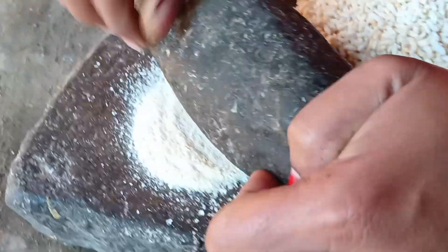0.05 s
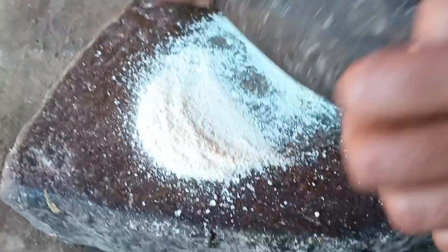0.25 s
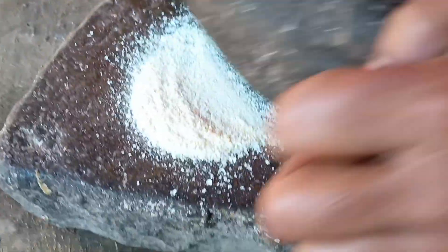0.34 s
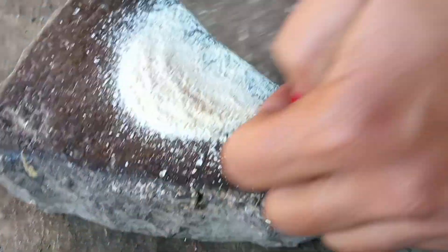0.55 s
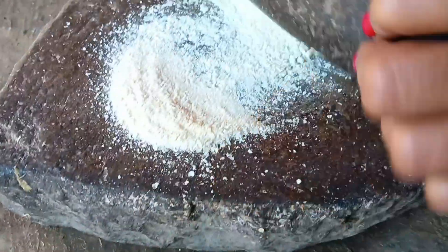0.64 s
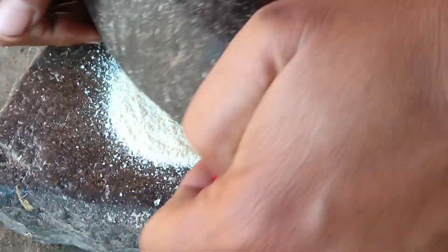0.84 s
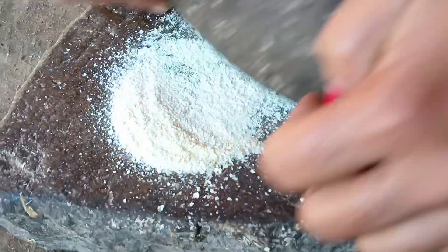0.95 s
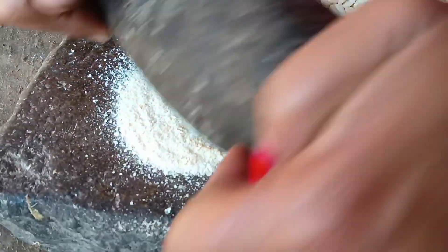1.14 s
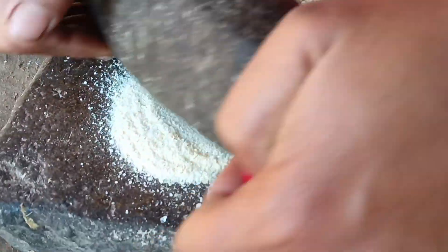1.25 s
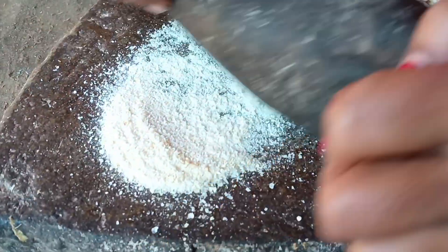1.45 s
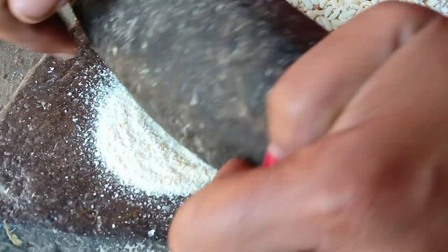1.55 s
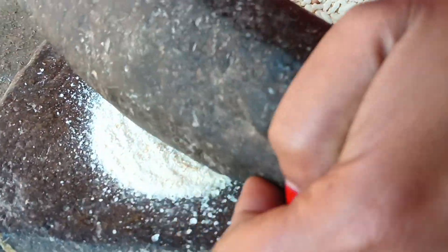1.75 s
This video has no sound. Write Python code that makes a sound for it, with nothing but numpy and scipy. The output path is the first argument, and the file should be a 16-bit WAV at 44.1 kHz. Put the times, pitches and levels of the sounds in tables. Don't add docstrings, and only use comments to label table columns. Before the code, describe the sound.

A stone muller grinds crushed rice on a stone slab, harder pushes alternating with lighter pulls, gritty and hissing; glass bangles clink loudly at the turns, chicks peep faintly in a quiet yard, heard close by.

```python
import sys
import numpy as np
from scipy import signal
from scipy.fft import rfft, irfft, next_fast_len
from scipy.io import wavfile
from scipy.ndimage import uniform_filter1d, map_coordinates

SR = 44100
rng = np.random.default_rng(int(sys.argv[2]) if len(sys.argv) > 2 else 0)


def master_out(mix):
    frames = np.transpose(np.atleast_2d(mix))
    ceiling = np.clip(frames, -1, 1)
    pcm = np.round(ceiling * 32767).astype(np.int16)
    wavfile.write(sys.argv[1], SR, pcm)


def undo_db(level):
    steps = np.asarray(level, float) / 20
    return 10 ** steps


N = 79380
T = np.arange(N) / SR


def unit(x):
    return x / np.sqrt(np.mean(x ** 2) + 1e-20)


def filtered(x, response):
    m = next_fast_len(len(x) + 8192)
    spectrum = rfft(x, m) * response(np.fft.rfftfreq(m, 1 / SR))
    return irfft(spectrum, m)[:len(x)]


def colour(points):
    f, db = np.transpose(points)
    return lambda hz: undo_db(np.interp(np.log(hz + 1), np.log(f), db))


def resonant(peaks):
    def response(f):
        total = 0
        for k, (centre, width, db) in enumerate(peaks):
            band = 1j * f * width
            total = total + (-1) ** k * undo_db(db) * band / (centre * centre - f * f + band)
        return total
    return response


def wobble(rate_hz):
    return map_coordinates(rng.standard_normal(int(N * rate_hz / SR) + 4), [T * rate_hz])


def grit(per_s, spread_db):
    hits = (rng.random(N) < per_s / SR) * rng.uniform(-0.68, 1, N)
    return hits * undo_db(spread_db * np.minimum(rng.exponential(size=N), 2))


def swell(rows, layer, top, pointed):
    power = 0
    warp = np.log(.5) / np.log(np.clip(top, .1, .9))
    for start, length, *db in rows:
        u = np.clip((T - start) / length, 0, 1) ** warp
        power = power + (undo_db(db[layer]) * np.abs(np.sin(np.pi * u)) ** pointed) ** 2
    return np.sqrt(power)


def yard():
    # f/Hz, level/dB per Hz
    air = [(24, -51), (55, 15.5), (237, 7), (1210, -2.5), (2770, 0.5), (3060, -1.5), (5440, -3),
           (6330, -14), (16000, -17.5)]
    noise = unit(filtered(rng.standard_normal(N), colour(air)))
    return undo_db(-50 + 0.86 * wobble(8.8)) * noise


def walls(x):
    t60_s = 0.16
    tail = filtered(rng.standard_normal(SR // 3), lambda f: 1 / (1 + f / 6000))
    tail = tail * undo_db(-60 * T[:SR // 3] / t60_s)
    return signal.fftconvolve(np.pad(x, (200, 0)), tail / np.linalg.norm(tail))[:N]


def chicks():
    # start/s, fall begins/s, end/s, top f/Hz, end f/Hz
    peeps = [
        (-.002, .04, .106, 5200, 3050),
        (.862, .92, 1.0, 3550, 2280),
        (1.128, 1.168, 1.218, 3390, 2380),
        (1.68, 1.715, 1.83, 5650, 4700),
        (1.712, 1.755, 1.765, 4620, 4550),
        (1.222, 1.245, 1.255, 5200, 5150),
    ]
    peep_db = [-52, -50, -45, -56.5, -58, -54.5]
    rise_s, rise_share = .006, .12
    fade_db, flutter_db, waver_hz = 4, 3.5, 20
    out = 0
    for (start, knee, end, top_hz, end_hz), db in zip(peeps, peep_db):
        down = np.sin(np.pi / 2 * np.clip((T - knee) / (end - knee), 0, 1)) ** 2
        rise = 1 - rise_share * np.exp(-np.abs(T - start) / rise_s)
        pitch_hz = top_hz * rise - (top_hz - end_hz) * down
        edge = np.clip(np.minimum(3 * (T - start), end - T) / 0.017, 0, 1)
        phase = 2 * np.pi * np.cumsum(pitch_hz + waver_hz * wobble(150)) / SR
        gain = undo_db(db - fade_db * down + flutter_db * wobble(69.53))
        out = out + np.sqrt(2) * edge * gain * np.sin(phase)
    return out


def thuds():
    # t/s, level/dB
    nudges = [
        (0.03, -32),
        (0.267, -29),
        (1.678, -35),
    ]
    out = 0
    for s, db in nudges:
        v = np.clip(T - s, 0, 1) / 0.0012
        out = out + undo_db(db) * 5.4 * v * (1 - v / 2) * np.exp(-v)
    return out


def loose_bangle():
    # t/s, f/Hz, level/dB, t60/s
    loose = [(.118, 10940, -40.5, 0.078), (0.458, 8580, -24.5, 0.043), (.803, 13690, -34, .1),
             (0.804, 8600, -32, 0.054), (1.0077, 11130, -26, 0.061), (1.206, 13100, -32, .08),
             (1.535, 13900, -19, 0.089), (1.646, 6850, -41.5, .08), (1.745, 13800, -35, 0.057),
             (.772, 2300, -49, .05), (.789, 2410, -41, .08), (.806, 2425, -33.5, 0.061),
             (0.791, 3430, -38, 0.028), (.808, 3300, -27, 0.022), (1.009, 3280, -28.5, 0.036),
             (1.012, 2390, -33, 0.075), (1.166, 2210, -40, .05), (1.177, 2485, -38.5, 0.086),
             (.417, 3180, -30.5, 0.025), (1.0095, 5300, -42, .02), (.145, 2226, -30, 0.065),
             (.518, 2090, -26, 0.046), (1.744, 8960, -33, 0.06)]
    out = 0
    for s, hz, db, t60_s in loose:
        decay = (T > s) * undo_db(db - 60 * np.abs(T - s) / t60_s)
        out = out + decay * np.sin(2 * np.pi * hz * (T - s))
    return out


def bangles():
    # t/s, peak/dB, brightness/dB per octave, decay factor,
    # free f/Hz
    clinks = [(0.0681, -16, 1.5, 0.94, 14000), (0.117, -18, 0.5, 0.9, 8600), (0.2358, -20, -23, 0.76, 8350),
              (0.2619, -13, -5, 2.4, 8600), (0.2817, -12.5, -8.5, 5.1, 8200),
              (0.4003, -28, -10, 0.74, 9530), (0.4162, -8.5, -3, 0.79, 12500),
              (0.4192, -14.5, -0.5, 1, 9600), (0.426, -24, 2, 0.8, 9900), (0.4411, -12.5, 5, 1.5, 9700),
              (0.4512, -24, 9, 0.6, 14000), (0.458, -6.5, -2, 0.65, 9700), (0.463, -8.5, 4, 1.2, 8750),
              (0.4671, -16.5, 0, 0.8, 8750), (0.635, 2.5, -3, 0.7, 9000), (0.7714, -15, -1, 0.89, 14700),
              (0.7881, -8, 5.5, 0.96, 9700), (0.7949, -4, 10, 0.79, 14500), (0.7993, -7.5, -4, 0.62, 8750),
              (0.8022, -3, 1.5, 1.4, 9400), (0.8049, -2.5, 10, 1.3, 9600), (0.811, -15.5, 5, 1.2, 13600),
              (0.8146, -17, 4, 1.6, 13700), (0.842, -35, -5, 0.7, 7500), (0.8475, -42, -6, 0.6, 7000)]
    later_clinks = [(0.9908, -22.5, 1, 1.9, 9800), (1.009, 1, -11.5, 0.46, 6830), (1.0135, -7, 6, 1.3, 9100),
                    (1.042, -11, 19, 0.7, 15000), (1.0446, -12, 12, 0.5, 15400), (1.1447, -26, -3, 1.4, 7400),
                    (1.1658, -11, 2, 1.7, 12600), (1.1683, -7, 4, 1.8, 8910), (1.1737, -12, -9, 1.5, 12600),
                    (1.1795, -12, 7, 1.1, 11000), (1.2068, -14, 3.5, 1.1, 9800), (1.225, -31, -11, 0.87, 7500),
                    (1.2287, -34, -11, 0.8, 7800), (1.3708, -20, 0, 4.2, 7000), (1.3898, -12, 3, 5.8, 9050),
                    (1.5103, -21, 0, 2.5, 9790), (1.5235, -18, -5, 1.1, 9530), (1.5308, -2.5, -1.5, 0.57, 7430),
                    (1.538, -12, -12, 0.39, 9600), (1.5536, -15, 1, 0.64, 9700), (1.6157, -49, 7, 1.6, 9400),
                    (1.6447, -29.5, -15, 1.2, 8940), (1.6763, -40, -20, 0.73, 8600),
                    (1.7442, -30, -5.5, 2.3, 9200)]
    # f/Hz, level/dB
    glass = [(3300, -12), (5300, -40), (6600, -3.5), (7300, -14), (8900, 4), (9550, 5.5), (11090, 0),
             (12450, -4.5), (13400, 5.5), (14350, -18), (15700, 1)]
    # f/Hz, level/dB
    crack_points = [(2000, -3), (3300, -14.5), (4500, -20.5), (6500, -5.5), (9000, 3), (11500, -11.5),
                    (15500, 1.5)]
    held_t60_s, t60_spread = .018, .25
    crack_db, crack_t60_s = 1.5, .018
    free_db, free_t60_s = -12, 0.03
    ring_db, rough_db, scatter_db, detune = -11, 2, 3, .008
    out, t = np.zeros(N + SR), np.arange(SR // 5) / SR
    hz, mode_db = np.transpose(glass)[:, :, None]
    for s, peak_db, bright, ring, free_hz in clinks + later_clinks:
        draw, noise = rng.standard_normal((4, len(hz), 1)), rng.standard_normal((2, len(t)))
        slow = t / np.clip(ring, .2, 4)
        tilt_db = lambda f: bright * np.log2(np.maximum(f, 6000) / 10000)

        fall_db = 60 * slow / (held_t60_s * np.exp(t60_spread * draw[3]))
        gains = undo_db(mode_db + tilt_db(hz) + scatter_db * draw[0] - fall_db)
        tones = (gains * np.sin(2 * np.pi * hz * (1 + detune * draw[1]) * t + 2 * draw[2])).sum(0)

        chatter = unit(uniform_filter1d(noise[1], size=60))
        crack = unit(filtered(noise[0], lambda f: colour(crack_points)(f) * undo_db(tilt_db(f))))
        crack = crack * undo_db(crack_db + 2.5 * chatter - 60 * slow / crack_t60_s)

        free = undo_db(free_db - 60 * slow / free_t60_s) * np.sin(2 * np.pi * free_hz * t)
        clink = undo_db(ring_db + rough_db * chatter) * tones + crack + free
        clink = clink * (1 - np.exp(-t / 0.00096))
        out[round(s * SR):][:len(t)] += undo_db(peak_db) * clink / np.abs(clink).max()
    return filtered(out[:N], lambda f: 1 / (1 + (2600 / (f + 1)) ** 6))


def strokes(layer, push_top, pull_top, pointed):
    # start/s, length/s, grind/dB, hiss/dB, rumble/dB
    pushes = [
        (.19, 0.23, -31.5, -29.5, -35.5),
        (.6, 0.19, -33, -32.5, -35),
        (1.01, 0.13, -27, -31, -30.5),
        (1.37, 0.16, -28.5, -31, -34.5),
    ]
    pulls = [
        (.05, 0.18, -38, -51.5, -41),
        (.4, 0.09, -46, -48, -47.5),
        (.48, 0.1, -35.5, -50.5, -43.5),
        (.53, 0.17, -45.5, -45.5, -57),
        (.85, 0.18, -36.5, -44.5, -43),
        (1.23, 0.2, -33.5, -41.5, -38),
        (1.52, 0.19, -56, -58, -51),
    ]
    return swell(pushes, layer, push_top, pointed), swell(pulls, layer, pull_top, pointed)


def slab_rocking(slips):
    # start/s, length/s, level/dB
    rocks = [
        (.04, 0.12, -46),
        (1.27, 0.27, -38),
        (1.5, 0.19, -47.5),
    ]
    # f/Hz, width/Hz, level/dB
    hollow_modes = [(238.4, 9.2, 7), (336, 28, -8), (385, 14, -1.5), (486, 23, -6)]
    hollow = lambda f: resonant(hollow_modes)(f) / (1 + (f / 700) ** 4)
    return unit(filtered(slips[::-1], hollow)) * swell(rocks, 0, top=0.44, pointed=0.77)


def slab_rumble(slips):
    # f/Hz, width/Hz, level/dB
    slab = [(85.2, 15, -4.5), (142, 45, -3.5), (196, 53.5, -0.5), (236.5, 36, -2.5)]
    drive = slips * np.hypot(*strokes(2, 0.53, 0.32, pointed=2.22)) * undo_db(1.3 * wobble(29.3))
    deep = lambda f: resonant(slab)(f) / (1 + (60 / (f + 1)) ** 4) / (1 + (f / 500) ** 2)
    return filtered(drive, deep) / np.std(filtered(slips, deep))


def powder_hiss(judder):
    # f/Hz, level/dB per Hz
    powder = [(1290, -8), (2200, -15), (3470, -3.5), (4490, -1), (5620, -6.5), (8370, 5.5), (10100, -6.5),
              (15100, 0), (16000, -18)]
    # f/Hz, width/Hz, level/dB
    slide = [(4000, 870, 4.5), (6230, 260, 8), (8270, 610, 7.5), (14000, 1800, -6.5)]
    spread_db = 1.5
    crumbs = unit(grit(8100, spread_db)) + undo_db(13) * grit(260, spread_db)
    push, pull = strokes(1, 0.38, 0.57, pointed=1.78)
    crushing = unit(filtered(crumbs, colour(powder))) * push
    sliding = unit(filtered(crumbs[::-1], resonant(slide))) * pull
    return (crushing + sliding) * undo_db(1.75 * judder + 2.0 * wobble(41.3))


def stone_grind(slips, judder):
    # f/Hz, width/Hz, level/dB
    stone = [(474, 155, -12), (870, 121, -5), (1203, 113, -9.5), (1363, 83, -4), (1456, 200, -3),
             (1624, 141, 4), (1693, 220, 0), (2030, 400, -1), (2204, 724, -6.5)]
    contact_shift = 0.054
    notch_hz, notch_width_hz, notch_depth = 983, 108, 0.5
    steep = lambda f: resonant(stone)(f) / (1 + (f / 3000) ** 2) * f / (f + 300)
    notch = lambda f: 1 - notch_depth * np.exp(-((f - notch_hz) / notch_width_hz) ** 2)
    low = filtered(slips, lambda f: steep(f * (1 + contact_shift / 2)))
    high = filtered(slips, lambda f: steep(f * (1 - contact_shift / 2)))
    place = wobble(8.9)
    ringing = unit(filtered(low * np.cos(place) + high * np.sin(place), notch))
    lumps_db = 1.5 * judder + 0.8 * wobble(26)
    return ringing * np.hypot(*strokes(0, 0.52, 0.45, pointed=1.28)) * undo_db(lumps_db)


def muller():
    judder = wobble(70.94)
    slips = unit(grit(per_s=2500, spread_db=2.5))
    return stone_grind(slips, judder) + powder_hiss(judder) + slab_rocking(slips) + slab_rumble(slips)


def scene():
    near = chicks() + thuds() + loose_bangle() + bangles() + muller()
    return (yard() + undo_db(-12) * walls(near) + near)[None]


def low_pass(x):
    return signal.sosfilt(signal.butter(12, 17150, fs=SR, output="sos"), x)


def record(dry):
    top_hz, edge_hz, low_hz = 15950, 45, 55

    def band(hz):
        top = np.maximum((1 - np.tanh((hz - top_hz) / edge_hz)) / 2, undo_db(-36))
        return top / (1 + (low_hz / (hz + 1)) ** 4)
    return low_pass(filtered(dry[0], band)[None])


dry = scene()
out = record(dry)
master_out(out)
```